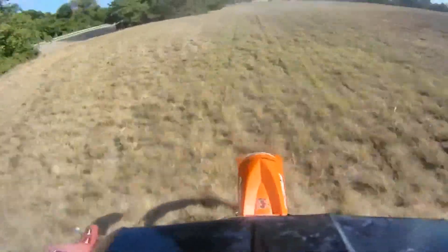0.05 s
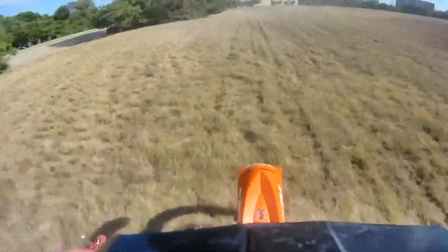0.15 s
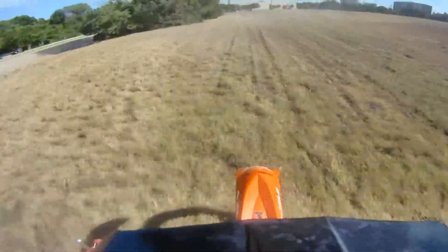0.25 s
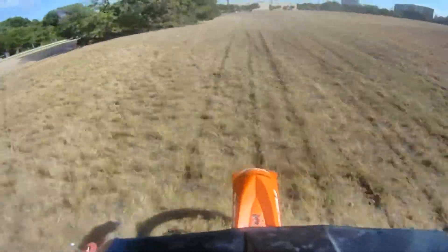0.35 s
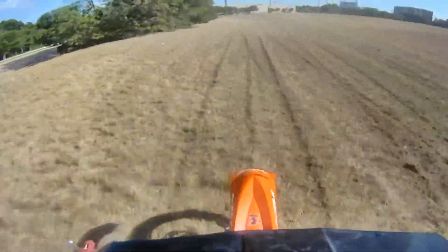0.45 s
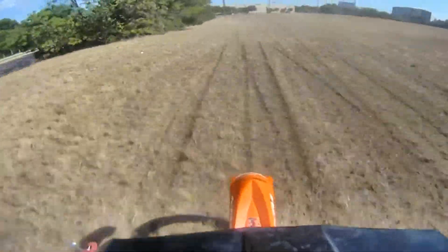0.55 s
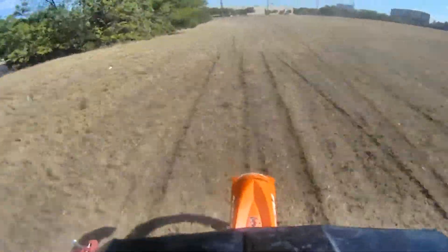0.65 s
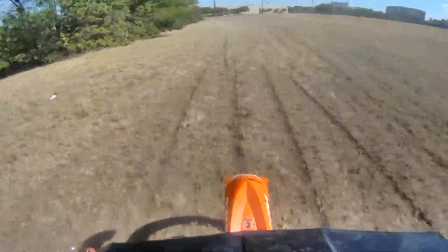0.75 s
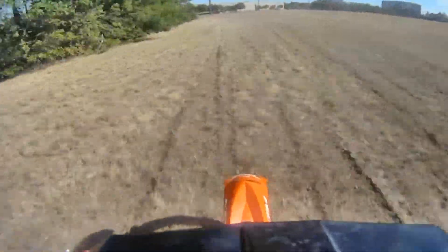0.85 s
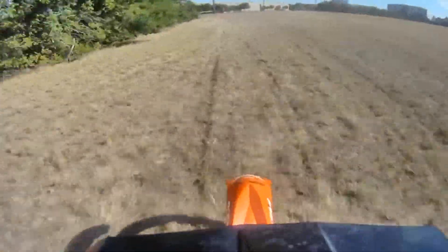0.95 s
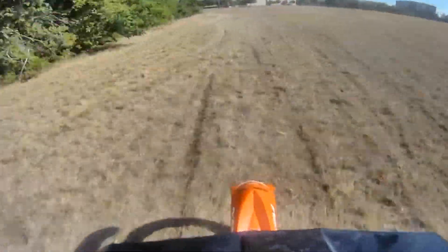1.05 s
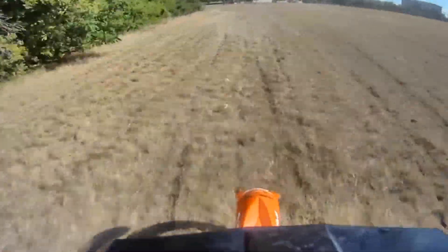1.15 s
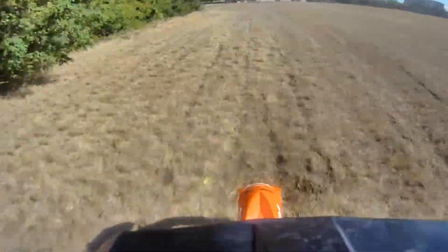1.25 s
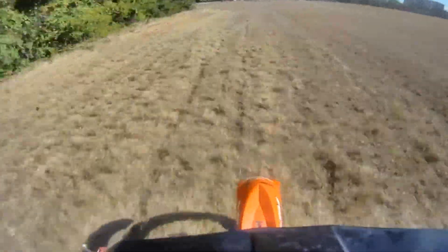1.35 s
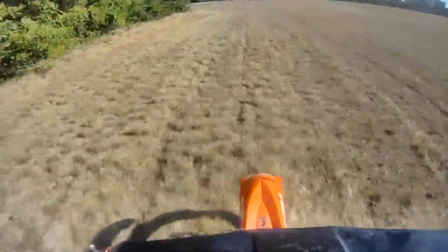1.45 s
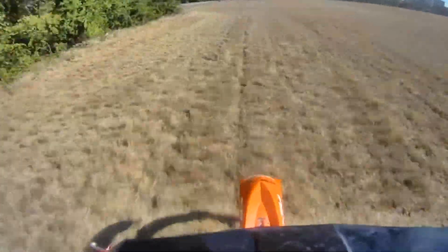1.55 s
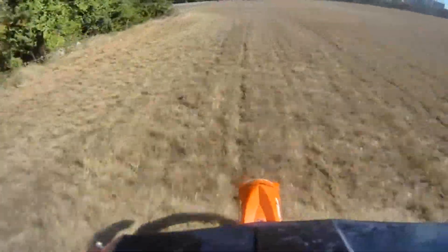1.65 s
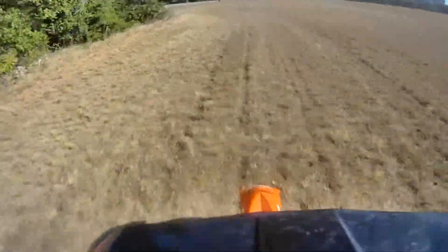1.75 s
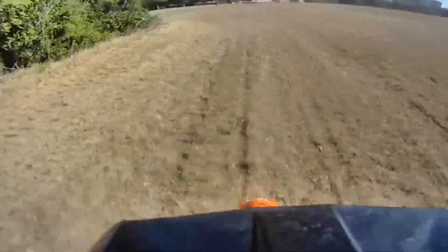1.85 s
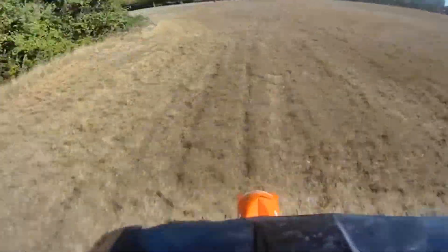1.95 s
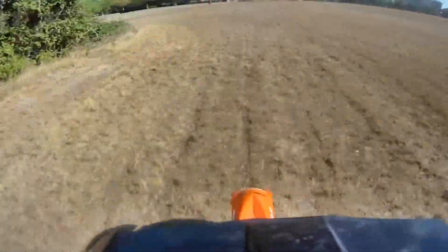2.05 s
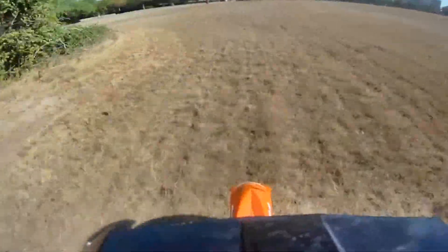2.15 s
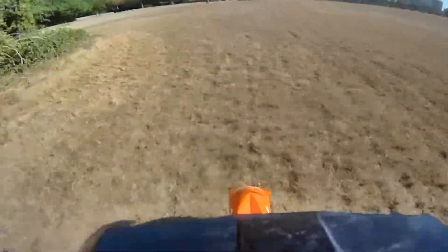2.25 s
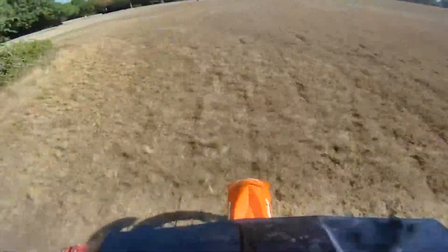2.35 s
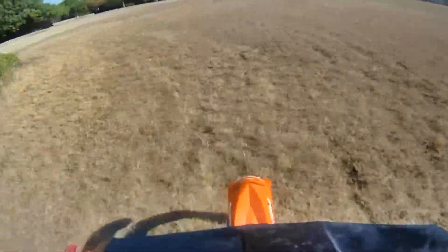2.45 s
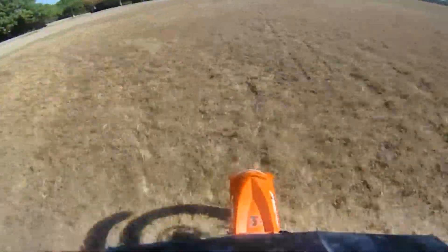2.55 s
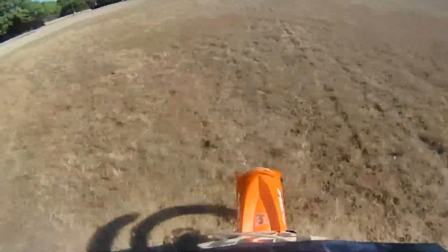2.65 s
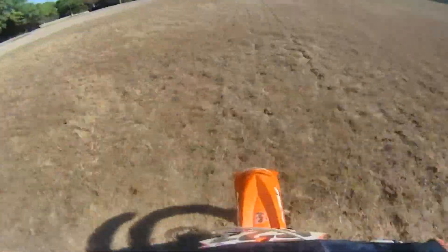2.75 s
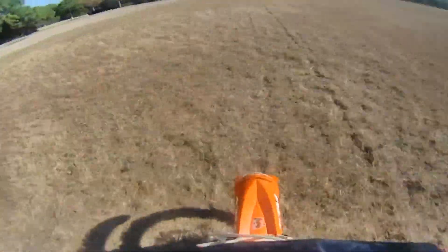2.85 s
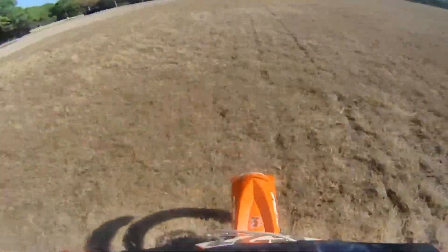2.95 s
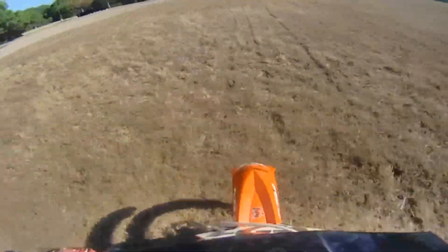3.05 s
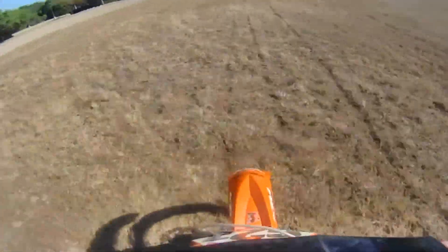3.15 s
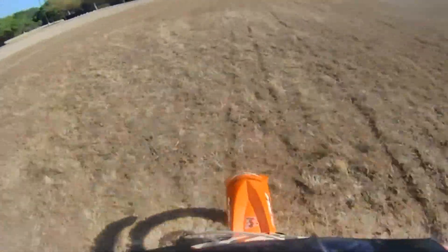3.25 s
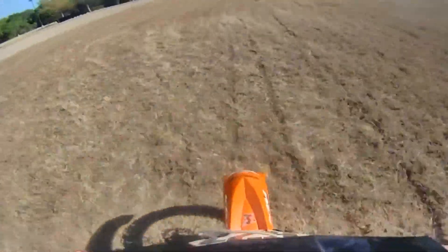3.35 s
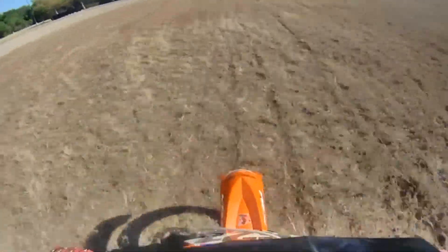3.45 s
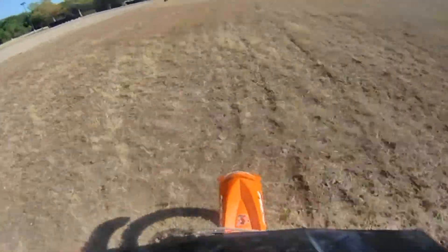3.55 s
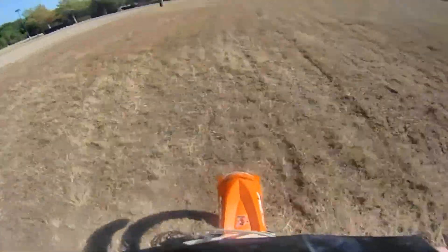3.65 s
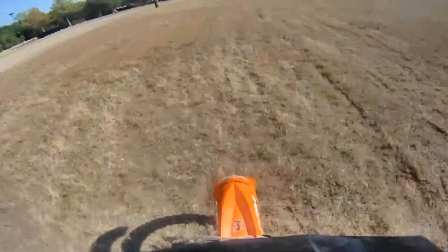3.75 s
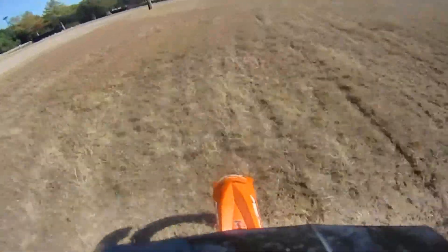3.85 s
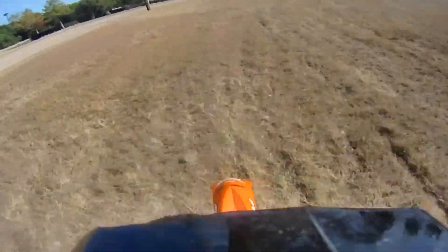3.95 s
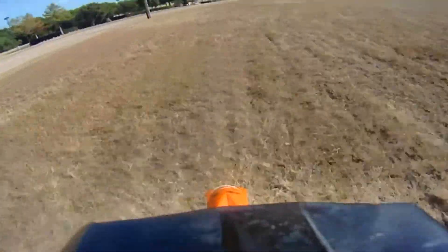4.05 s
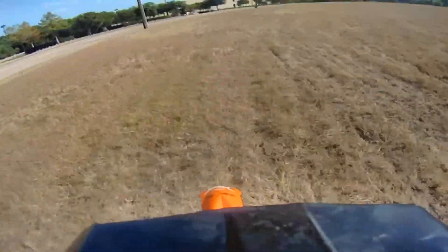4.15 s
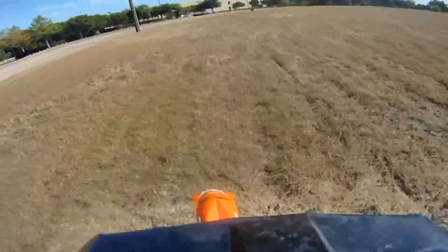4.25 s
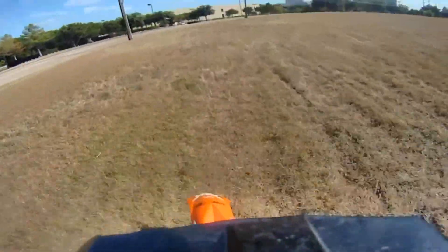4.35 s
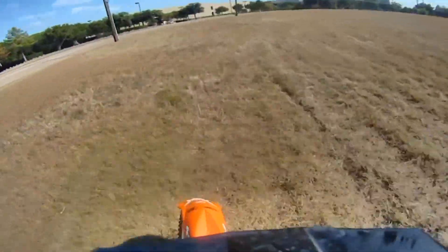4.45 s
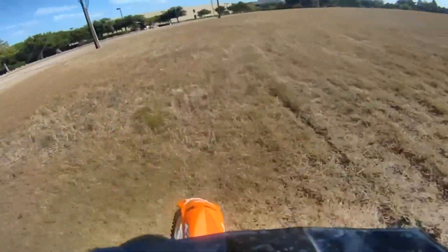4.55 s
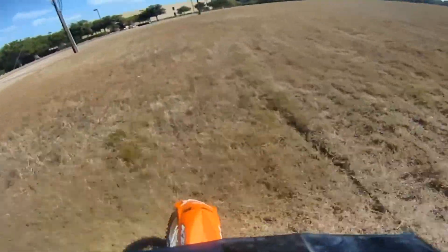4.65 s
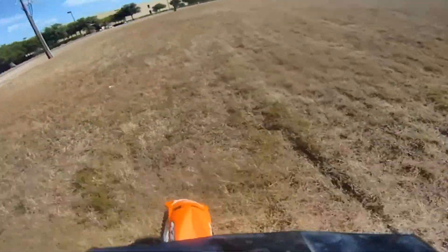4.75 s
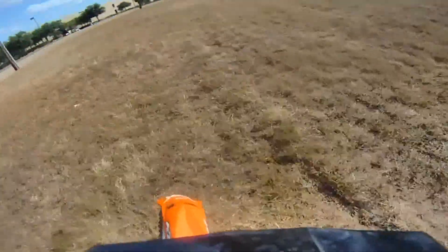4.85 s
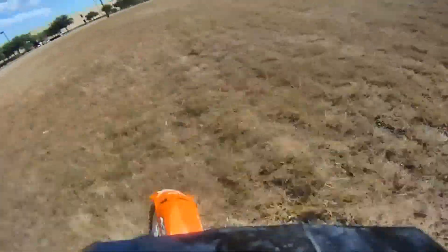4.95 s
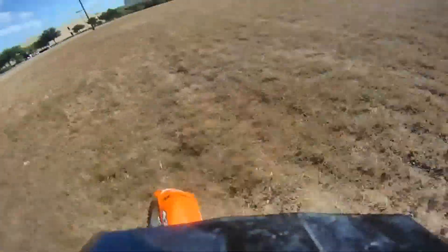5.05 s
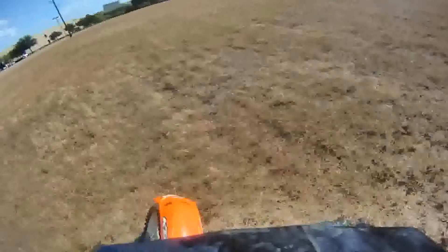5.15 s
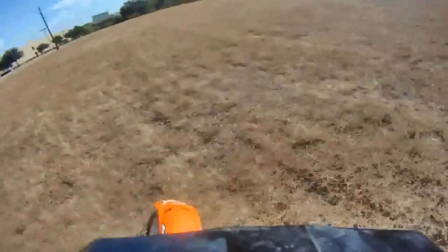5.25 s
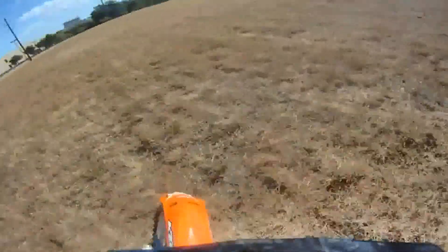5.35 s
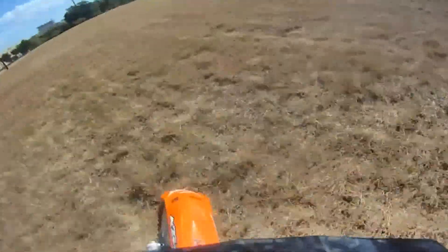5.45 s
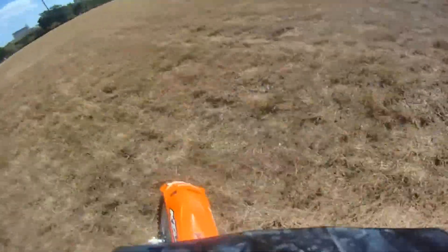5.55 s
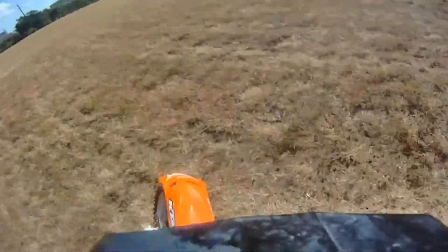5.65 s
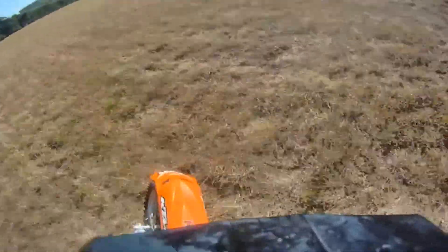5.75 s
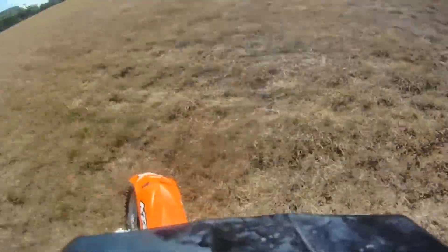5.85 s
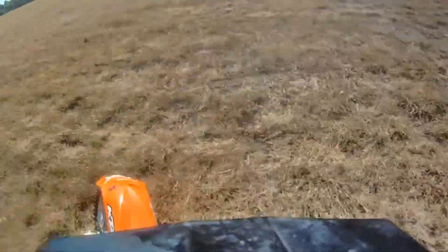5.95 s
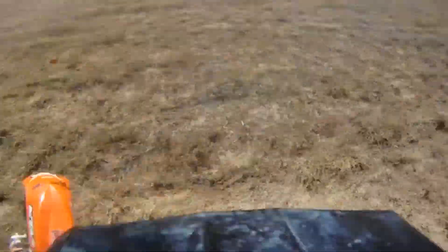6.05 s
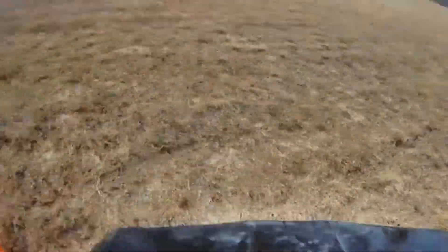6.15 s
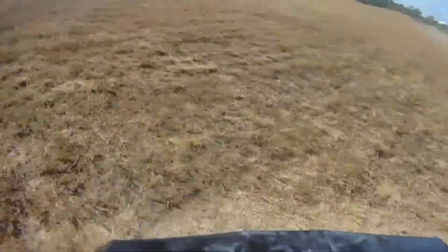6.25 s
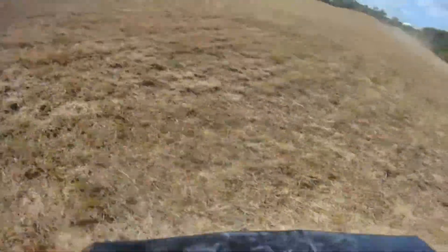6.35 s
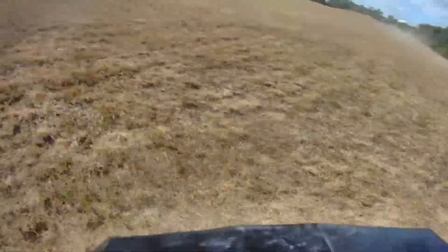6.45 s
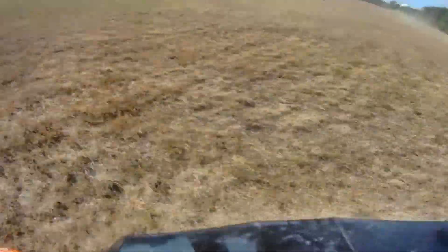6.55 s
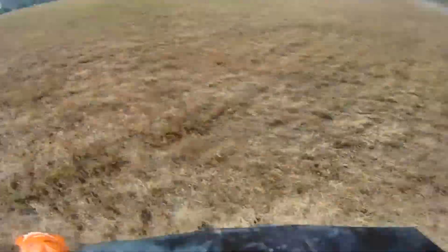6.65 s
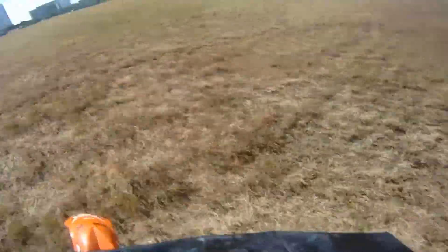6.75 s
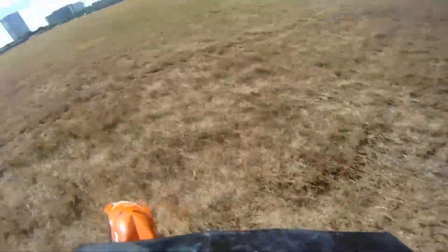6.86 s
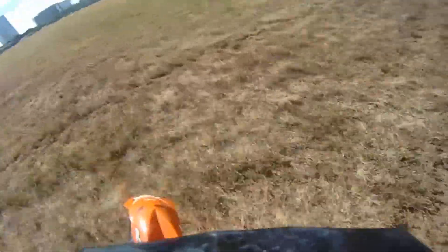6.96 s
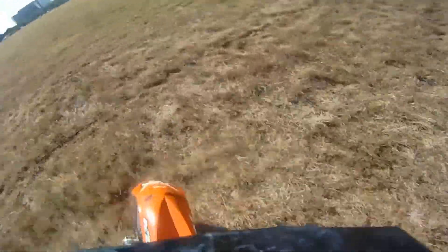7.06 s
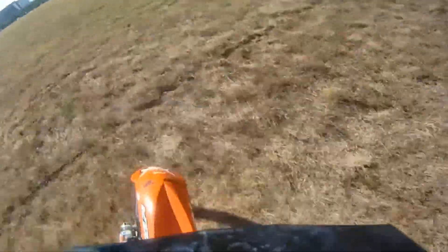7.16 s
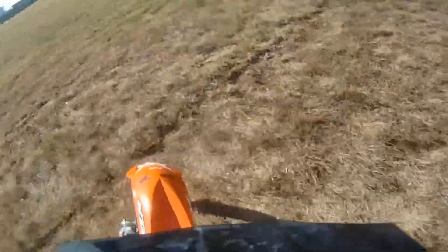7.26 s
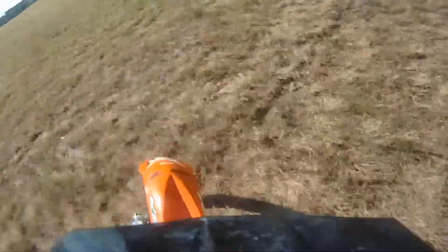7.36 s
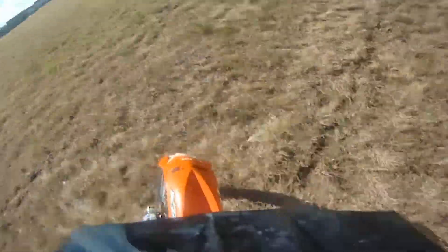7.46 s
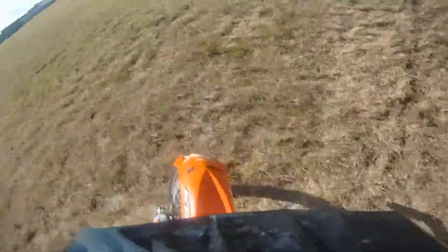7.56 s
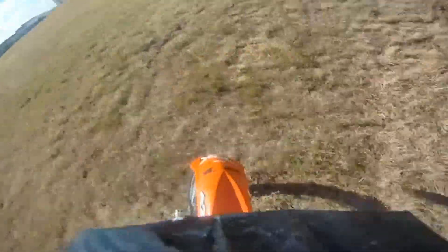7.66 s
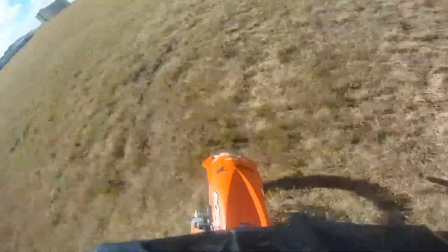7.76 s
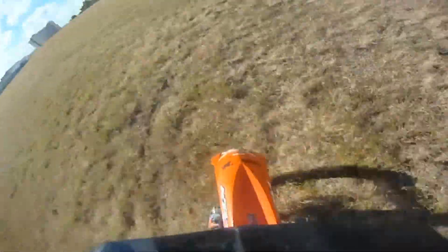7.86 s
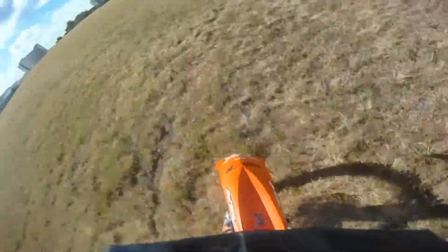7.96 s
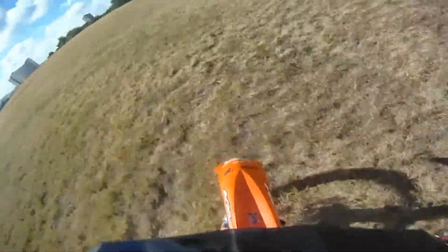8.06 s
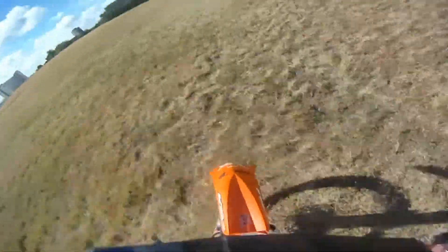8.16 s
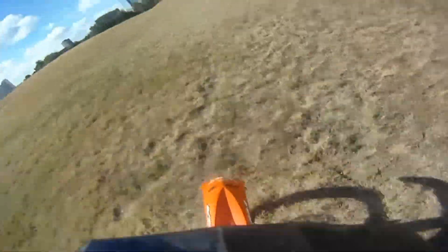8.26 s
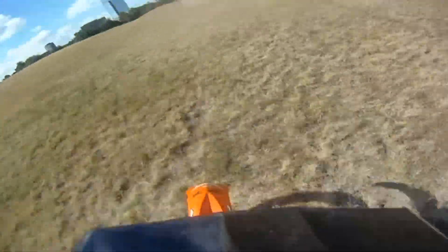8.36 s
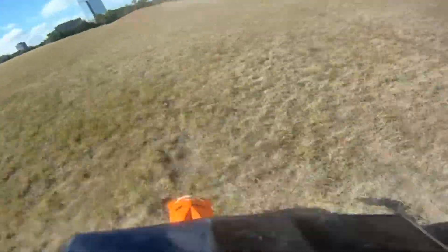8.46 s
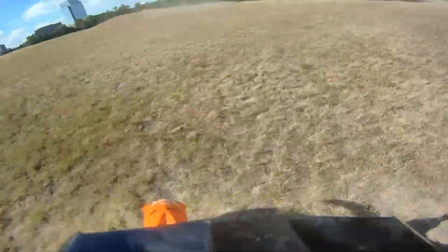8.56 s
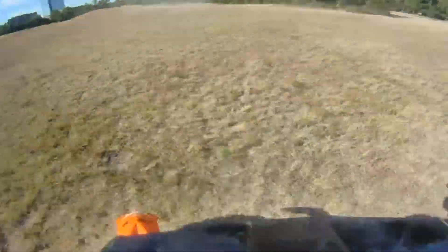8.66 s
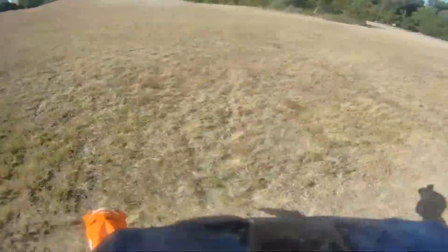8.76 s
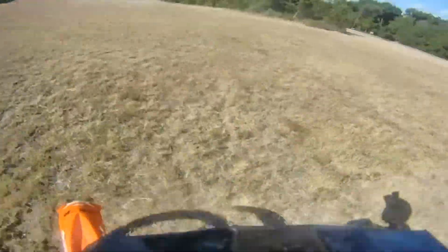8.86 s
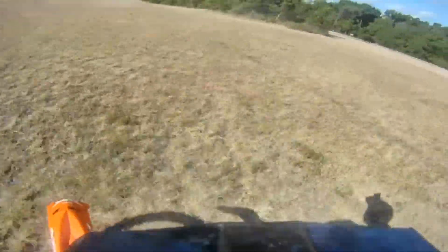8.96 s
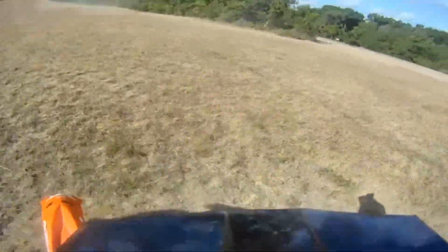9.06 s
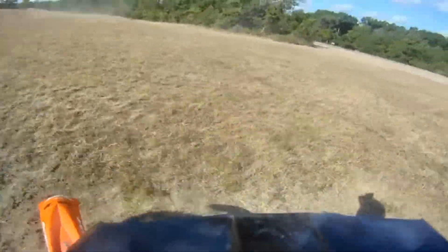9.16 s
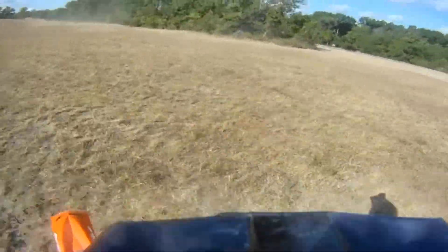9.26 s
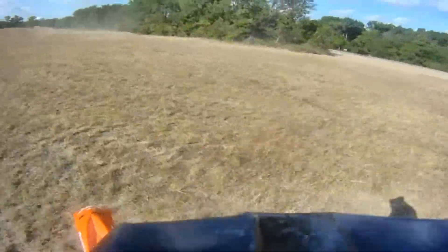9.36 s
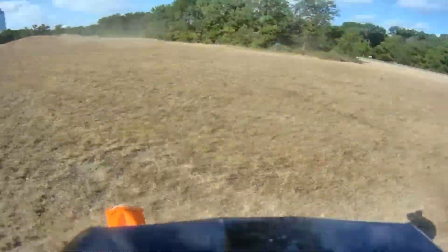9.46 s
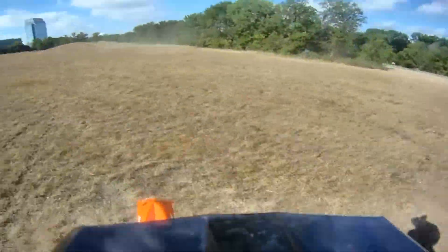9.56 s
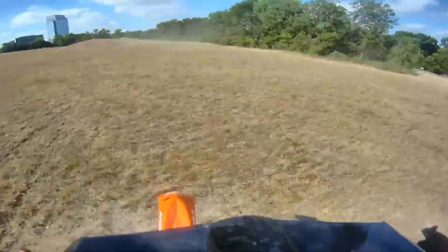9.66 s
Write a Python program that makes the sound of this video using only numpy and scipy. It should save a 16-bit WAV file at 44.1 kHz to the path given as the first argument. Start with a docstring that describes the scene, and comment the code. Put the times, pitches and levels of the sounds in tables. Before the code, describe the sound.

Helmet-mounted sound of a small dirt bike at full throttle, its wind roar fading into low puttering, bumps and ticks.

```python
"""A small two-stroke dirt bike heard from a sealed helmet camera. It starts flat out, exhaust pulses sounding
the tuned pipe, wind roar and engine clatter ringing the camera case. The throttle shuts, grit strikes the
case and the roar fades as the bike brakes. Bumps shake the helmet and the mount ticks. The engine putters,
chugs round a bend firing every second turn, pulls away, then drops off load. Throughout, the recorder
samples at a low rate and holds each value, which mirrors the sound into the treble."""
import sys
import numpy as np
from scipy import signal
from scipy.fft import rfft, irfft
from scipy.io import wavfile
from scipy.ndimage import uniform_filter1d, minimum_filter1d

SR = 44100
rng = np.random.default_rng(int(sys.argv[2]) if len(sys.argv) > 2 else 0)


def pcm_store(signal):
    """Save signal as 16-bit PCM."""
    levels = np.round(np.clip(np.atleast_2d(signal), -1, 1) * 32767)
    wavfile.write(sys.argv[1], SR, levels.astype(np.int16).T)


N = 428652
TIME_S, BIN_HZ = np.arange(N) / SR, np.arange(N // 2 + 1) * SR / N


def from_db(db):
    return 10 ** (np.asarray(db) / 20)


def unit_rms(x):
    return x / np.sqrt(np.mean(x ** 2) + 1e-20)


def curves(rows):
    """One per-sample curve for each column after time_s."""
    time_s, *columns = np.transpose(rows)
    return [np.interp(TIME_S, time_s, column) for column in columns]


def coloured(x, spectrum):
    """Filter by (freq_hz, gain_db) points."""
    hz, gain_db = np.transpose(spectrum)
    gain = from_db(np.interp(np.log(np.maximum(BIN_HZ, 1)), np.log(hz), gain_db))
    return irfft(rfft(x) * gain, N)


def drift(rate_hz, spread_db):
    """Randomly wandering gain."""
    r = np.exp(-80 * np.pi * rate_hz / SR)
    slow = signal.lfilter([1], [1, -2 * r, r * r], rng.standard_normal(N // 40 + 2002))[2000:]
    return np.interp(np.arange(N) / 40, np.arange(len(slow)), from_db(spread_db * unit_rms(slow)))


def resonance(x, hz, *widths_hz):
    """Unity-peak two-pole resonators in series, one per width."""
    for width_hz in widths_hz:
        r = np.exp(-np.pi * width_hz / SR)
        poles = [1, -2 * r * np.cos(2 * np.pi * hz / SR), r * r]
        x = signal.lfilter(np.array([1, 0, -1]) * (1 - r * r) / 2, poles, x + 1e-18)
    return x


def bursts(events, rise_s, fall_s):
    """Envelope that swells and dies at each (start_s, level_db)."""
    impulses = np.zeros(N)
    impulses[[round(e[0] * SR) for e in events]] = from_db([e[1] for e in events])
    t = TIME_S[:4000]
    shape = np.exp(-t / fall_s) - np.exp(-t / rise_s)
    return signal.fftconvolve(impulses, shape / shape.max())[:N]


# ground bumps: peak_s, level_db
BUMPS = [(.24, -30), (.46, -28), (.75, -31), (.97, -32), (1.13, -26), (1.55, -28), (1.96, -30), (2.27, -26),
         (2.46, -27), (2.655, -18), (2.98, -24), (3.16, -31), (3.3, -25), (3.46, -27), (3.78, -36),
         (4.33, -33), (4.6, -34), (4.72, -36), (5.06, -37), (5.25, -40), (5.455, -29), (5.74, -37),
         (5.87, -28), (6.075, -25.5), (6.6, -43), (6.8, -40), (7.01, -34), (7.1, -31), (7.23, -31),
         (7.39, -39), (7.78, -29.5), (7.96, -26), (8.64, -27), (9.26, -37)]


def bumps(rise_s=0.045, fall_s=0.063):
    """Envelope of the bumps, summed in power."""
    t = TIME_S[::40]
    power = sum((from_db(db) * np.exp(-((t - s) / np.where(t < s, rise_s, fall_s)) ** 2)) ** 2
                for s, db in BUMPS)
    return np.interp(TIME_S, t, np.sqrt(power))


# rumble spectrum: freq_hz, density_db
RUMBLE_SPECTRUM = [(45, -30), (70, -8), (93, 1), (115, -5), (139, -2), (190, -10.5), (300, -25), (450, -16),
                   (900, -45.5)]


def rumble(level_db, bumped):
    """Low, lumpy noise that swells on bumps."""
    envelope = np.hypot(from_db(level_db) * drift(5.2, 1.5), from_db(-19) * bumped)
    return envelope * unit_rms(coloured(rng.standard_normal(N), RUMBLE_SPECTRUM))


def helmet_boom(level_db, pitch_hz=269.8):
    """Air resonating inside the helmet."""
    hollow = resonance(rng.standard_normal(N), pitch_hz, 53, 195)
    return from_db(level_db) * drift(5.5, 2) * unit_rms(hollow)


def helmet_shake(rumble_db, bumped, bob_hz=36, sway_hz=(10, 19.8)):
    """Rough ground and bumps bob the helmet at its own rate over a slower sway."""
    rough = from_db(-38.5 + 0.36 * (rumble_db + 42)) * drift(7, 4)
    bob = resonance(rng.standard_normal(N), bob_hz, 15, 24)
    sway = signal.sosfilt(signal.butter(2, sway_hz, "band", fs=SR, output="sos"), rng.standard_normal(N))
    motion = unit_rms(bob) + from_db(-6) * unit_rms(sway)
    motion /= np.sqrt(uniform_filter1d(motion ** 2, size=2600) + 0.089)   # even out the level
    return signal.sosfiltfilt(signal.butter(3, 62, fs=SR, output="sos"), np.hypot(rough, bumped) * motion)


# mount contacts: start_s, level_db, clank_gain_db
MOUNT_TICKS = [(2.628, -24, -6), (2.7746, -31, 8), (3.512, -33, 7), (3.521, -35, 6), (3.527, -39, 4),
               (3.672, -35, 6), (3.679, -34, 9), (3.685, -39, 4), (4.964, -31.5, -1), (5.1093, -31, 4),
               (5.4904, -33, -6), (5.6785, -29.5, -2), (5.724, -31.5, -16), (6.029, -31.5, -4),
               (6.1146, -34, 16.5), (6.274, -31.5, -4), (6.377, -36, -6), (6.3864, -31.5, -9),
               (7.7029, -25, -8), (7.73, -27, -8), (7.874, -25, -6), (8.406, -36, -11), (8.586, -25, -15),
               (8.5954, -26, -14), (8.5983, -30, -12), (8.899, -35, -11)]


def mount_ticks(decay_s=0.0045, faint_count=11, faint_from_s=2.9):
    """Plastic contacts scratch three high modes and a lower clank; faint ones come at random."""
    modes = [(3670, 210, 2), (4500, 1200, -3.5), (5200, 410, -11)]   # pitch_hz, width_hz, gain_db
    out, t = np.zeros(N + 1500), TIME_S[:1500]
    faint = [(faint_from_s + when * (N / SR - faint_from_s), -44 + 8 * strength, -6)
             for when, strength in rng.random((faint_count, 2))]
    for start_s, level_db, clank_db in faint + list(MOUNT_TICKS):
        scratch = from_db(level_db + 6.5) * rng.standard_normal(1500) * np.exp(-t / decay_s)
        scratch[0] = from_db(level_db + 21.5)
        ring = sum(from_db(db) * resonance(scratch, hz, width) for hz, width, db in modes)
        clank = from_db(clank_db) * resonance(scratch, 2940, 470)
        out[round(start_s * SR):][:1500] += ring + clank
    return out[:N]


# grit strikes: start_s, level_db, pitch_hz, t60_s, lower_note_db
GRIT = [(2.0045, 10, 1990, 0.015, -7), (4.4177, -18.5, 2350, 0.028, -6.5), (5.1596, -21, 1790, 0.029, -28)]


def grit_knocks(lower_ratio=0.49, attack_s=0.0007):
    """Each strike rings one wall of the case, with a lower note under it."""
    out, t = np.zeros(N), TIME_S[:3000]
    for start_s, level_db, hz, t60_s, lower_db in GRIT:
        phase = 2 * np.pi * hz * t
        notes = np.sin(phase) + from_db(lower_db) * np.sin(lower_ratio * phase)
        envelope = (1 - np.exp(-t / attack_s)) * from_db(level_db - 1 - 60 * t / t60_s)
        out[round(start_s * SR):][:3000] += notes * envelope
    return out


# case modes: pitch_hz
CASE_HZ = [555, 673, 785, 1020, 1128, 1315, 1560, 1792, 1990, 2160, 2335, 2570, 3042, 3510, 3780, 4620,
           5250, 5800]
# per mode: width_hz, wind_gain_db, engine_gain_db
CASE_RESPONSE = [(90, -30.5, -9.5), (83, -12, -5), (94.5, 2, -17), (111, 5.5, -9), (105, 4.5, 2.5),
                 (158, 3, -8), (99, 0, -8.5), (93, 2.5, 2), (192, 4, -7), (215, 3, -7), (123, 8, -1.5),
                 (105, 5.5, -3.5), (103, -13, -6), (177, -10.5, -12), (263, -8, -23.5), (320, -45, -17.5),
                 (636, -10.5, -22), (500, -14.5, -25)]
# per mode, engine off load: change_db
COASTING_DB = [0.5, 1, -8, -1, -0.5, 2.5, -1.5, -2, 2, 1.5, 1.5, 4.5, 0.5, -0.5, -11, -0.5, -14, -6]


def camera_case(envelope, by_engine, flicker_db, coasting=0):
    """Enveloped noise rings the case modes, each flickering on its own."""
    noise = envelope * rng.standard_normal((2, N))
    out, power = 0, 0
    for k, (width_hz, wind_db, engine_db) in enumerate(CASE_RESPONSE):
        width_hz = width_hz if by_engine else width_hz * 1.69   # broadband wind blurs the modes
        gain = from_db(engine_db if by_engine else wind_db)
        coast_gain = 1 + coasting * (from_db(COASTING_DB[k]) - 1)
        ringing = resonance(noise[k % 2], CASE_HZ[k], width_hz, width_hz)
        out = out + gain * coast_gain * drift(7.3, flicker_db) * ringing
        power += gain ** 2 * np.pi * width_hz / SR / 2
    return out / np.sqrt(power)


# part-throttle firing runs: first_s, last_s, first_db, last_db
CHUG_RUNS = [(4.2592, 4.2592, -31, -30), (4.576, 4.576, -32, -33), (5.7194, 5.7794, -36, -28),
             (5.8527, 6.0344, -26.5, -26.5), (6.097, 6.1589, -26, -32), (6.1994, 6.8, -29, -29.5),
             (6.325, 6.6129, -28, -28), (6.6557, 7.0693, -24, -22)]
# per run: firing_count
CHUGS_PER_RUN = [1, 1, 2, 5, 2, 3, 7, 10]


def chug_firings(jitter_s=0.0007, spread_db=1):
    """Near-evenly spaced firings that rattle the case, as (start_s, level_db)."""
    runs = [np.linspace(run[::2], run[1::2], count) for run, count in zip(CHUG_RUNS, CHUGS_PER_RUN)]
    firings = np.concatenate(runs)
    return firings + rng.standard_normal(firings.shape) * [jitter_s, spread_db]


# engine clatter's part of the roar, the rest wind: time_s, power_share
CLATTER_SHARE = [(0, 0.03), (1, 0.22), (2, 0.21), (3, 0.45), (4, 0.78), (5.6, 0.84), (6, 0.8), (7, 0.86),
                 (8.1, 0.94), (8.4, 0.45), (9, 0.42), (9.72, 0.54)]


def case_roar(level_db, rasp, load):
    """Wind, grit jolts, engine clatter, gas rasp and chugs all drive the case."""
    share = np.clip(curves(CLATTER_SHARE)[0], 0, 1)
    roar = from_db(level_db) * drift(26, 0.75) * drift(5.4, 0.56)
    jolts = from_db(-14.5) * bursts(GRIT, rise_s=0.00056, fall_s=0.0017)
    firings = chug_firings()
    fronts = from_db(-8) * bursts(firings, rise_s=0.00034, fall_s=0.0037)
    chugs = from_db(-8) * bursts(firings, rise_s=0.0023, fall_s=0.01)
    wind = camera_case(roar * np.sqrt(1 - share) + jolts + fronts, by_engine=False, flicker_db=0.6)
    clatter = np.sqrt(roar ** 2 * share + rasp ** 2 + chugs ** 2)
    return wind + camera_case(clatter, by_engine=True, flicker_db=1.66, coasting=1 - load)


# steady throttle: start_s, end_s, first_db, last_db, load_flag
PULLS = [(-.1, .85, -8, -13, 1), (3, 4.7, -30, -34, 0), (4.68, 5.7, -30.5, -28.5, 0),
         (5.78, 7.09, -30, -26.5, 1), (7.05, 8.13, -24, -22.5, 1), (8.15, 9.8, -34, -33, 0)]


def throttle(travel_s=0.048):
    """Pulse size and load: each pull ramps open, glides in level and ramps shut."""
    size, load = 0, 0
    for start_s, end_s, first_db, last_db, loaded in PULLS:
        gate = np.clip(np.minimum(TIME_S - start_s, end_s - TIME_S) / travel_s, 0, 1)
        size = size + gate ** 2 * from_db(np.interp(TIME_S, [start_s, end_s], [first_db, last_db]))
        load = load + gate * loaded
    return size, load


def lugging_pipe(pulses, load):
    """At low speed the pipe rings in separate notes; the deep ones weaken off load."""
    def ring(notes):   # pitch_hz, width_hz, gain_db
        return sum(from_db(db) * resonance(pulses, hz, width, width) for hz, width, db in notes)

    deep = ring([(110, 30, -4), (180, 50, -1), (230, 50, 1)])
    upper = ring([(300, 50, 0), (345, 50, -2.5), (640, 140, -11)])
    return from_db(3.5 - 8 * (1 - load)) * deep + from_db(2.5) * upper


# pipe spectrum at tuned speed: freq_hz, gain_db
PIPE_SPECTRUM = [(90, -20), (280, -10), (410, -4), (540, -3), (670, 4), (900, -8), (1130, -3), (1500, -6),
                 (1800, 8), (2100, 1), (2350, 6), (2600, 2), (2850, -12), (3000, -2), (3200, -14),
                 (3430, -5), (4000, -16), (6000, -20)]


def tuned_pipe(pulses, bounces_s=(0.0011, 0.0019, 0.0031), reflection=0.6):
    """The pipe colours each pulse; allpass reflections draw it out in time."""
    delays = [np.exp(-2j * np.pi * BIN_HZ * lag_s) for lag_s in bounces_s]
    allpass = np.prod([(z - reflection) / (1 - reflection * z) for z in delays], axis=0)
    return irfft(rfft(coloured(pulses, PIPE_SPECTRUM)) * allpass, N)


# crank speed: time_s, turns_per_s
CRANK = [(0, 131.5), (.12, 130.5), (.32, 136.6), (.64, 140.3), (.9, 141.5), (3, 64), (3.43, 55),
         (3.8, 48.8), (4, 46.5), (4.55, 41.5), (4.69, 44.7), (4.86, 50.4), (5.24, 49.5), (5.72, 45),
         (5.9, 46.4), (6.3, 41.4), (6.8, 43.4), (7.07, 45.6), (7.37, 47.6), (7.63, 53.6), (7.8, 56.6),
         (8, 58.5), (8.13, 58.7), (8.2, 47.8), (8.42, 47.3), (9, 43.6), (9.25, 41.3), (9.45, 41.2),
         (9.72, 39)]


def exhaust(size, load, bend_s=(5.725, 7.065), tuned_above_hz=90):
    """One pulse per turn, every second turn in the bend. Returns pipe sound and gas rasp envelope."""
    skipping = (TIME_S > bend_s[0]) & (TIME_S < bend_s[1])
    firing_hz = curves(CRANK)[0] / (1 + skipping)
    cycles = np.cumsum(firing_hz * drift(25, 0.015)) / SR
    pulses = np.diff(np.floor(cycles), prepend=0) * size * np.sqrt(SR / firing_hz) * drift(37, 0.54)
    tuned = firing_hz > tuned_above_hz
    rasp = from_db(-15.5) * size * load * ~skipping * 2.94 * np.exp(-2.5 * (cycles % 1))
    return tuned_pipe(pulses * tuned) + lugging_pipe(pulses * ~tuned, load), rasp


# levels along the ride: time_s, roar_db, boom_db, rumble_db
RIDE = [(0, -16, -33, -31.5), (.5, -13, -34, -33.5), (1.1, -12, -30.5, -24.5), (1.5, -13, -32.5, -27.5),
        (1.97, -15.5, -35, -26.5), (2.03, -18, -35.5, -34), (2.4, -19.5, -38.5, -30.5),
        (2.8, -27, -40, -39), (3, -30, -43.5, -40), (3.5, -35, -49.5, -45), (4.4, -41, -53.5, -53),
        (4.9, -41, -55, -54.5), (5.6, -41.5, -56.5, -56), (5.9, -39, -52, -49), (6.5, -43, -52, -50.5),
        (6.9, -41, -48, -47), (7.12, -37, -52, -52), (7.8, -32.5, -51, -49), (8.08, -31.5, -45, -54),
        (8.15, -41, -50, -46), (8.55, -38.5, -48, -50), (8.9, -41.5, -53.5, -49), (9.3, -37, -50, -45),
        (9.72, -42, -54, -52)]


def scene():
    """Mono sum of bike, helmet and camera sounds."""
    roar_db, boom_db, rumble_db = curves(RIDE)
    size, load = throttle()
    pipe, rasp = exhaust(size, load)
    roar = case_roar(roar_db, rasp, load)
    bumped = bumps()
    lows = rumble(rumble_db, bumped) + helmet_boom(boom_db) + helmet_shake(rumble_db, bumped)
    return (lows + mount_ticks() + grit_knocks() + roar + pipe)[None]


def record(dry, anti_alias_hz=5450, ceiling=0.9, hold_hz=12000, cutoff_hz=15620):
    """Anti-alias filter, peak limiter, sample and hold (mirror images under a sinc), steep top cut."""
    low = signal.sosfilt(signal.butter(12, anti_alias_hz, fs=SR, output="sos"), dry)
    allowed_gain = np.minimum(1, ceiling / (np.abs(low) + 1e-9))
    limited = low * uniform_filter1d(minimum_filter1d(allowed_gain, size=180), size=180)
    mirrored = limited * (1 + 2 * np.cos(2 * np.pi * hold_hz * TIME_S))
    held = irfft(rfft(mirrored) * np.sinc(BIN_HZ / hold_hz), N)
    return signal.sosfilt(signal.ellip(12, 0.5, 75, cutoff_hz, fs=SR, output="sos"), held)


dry = scene()
out = record(dry)
pcm_store(out)
```